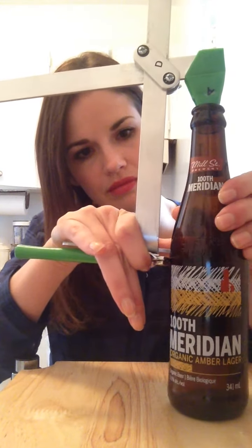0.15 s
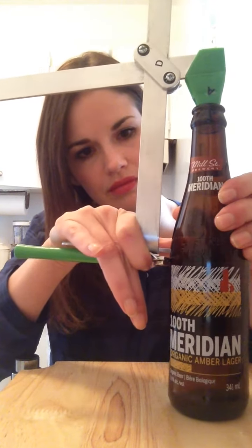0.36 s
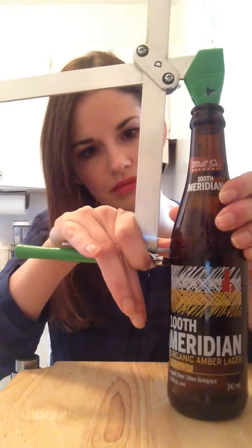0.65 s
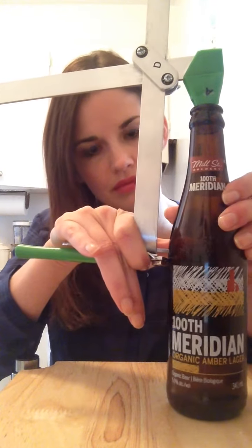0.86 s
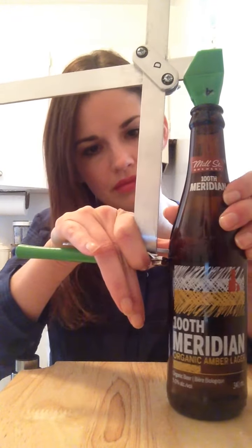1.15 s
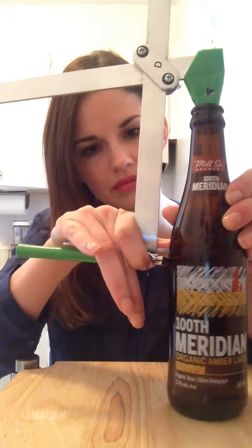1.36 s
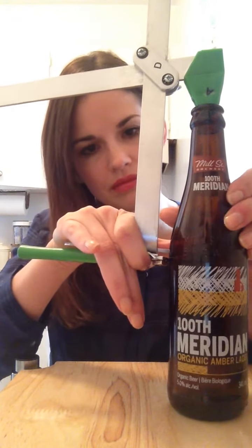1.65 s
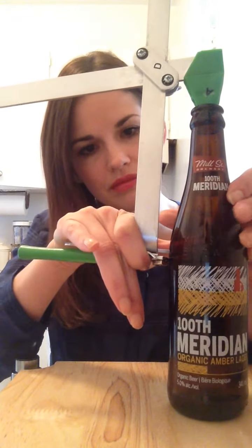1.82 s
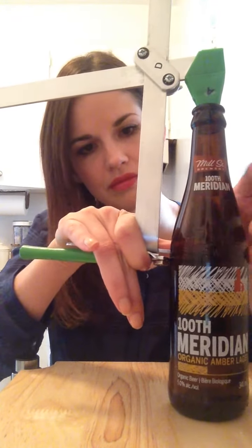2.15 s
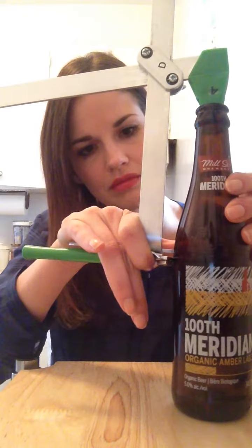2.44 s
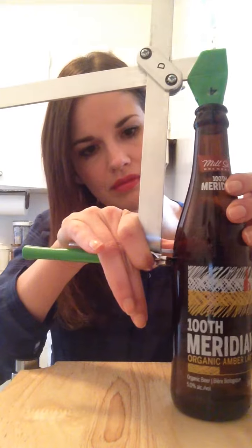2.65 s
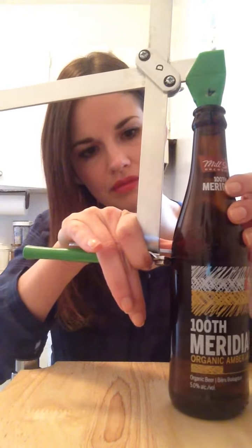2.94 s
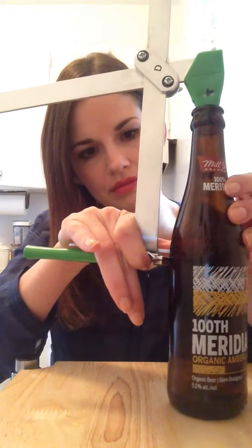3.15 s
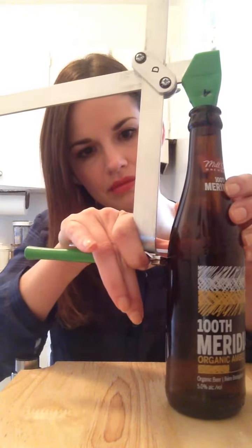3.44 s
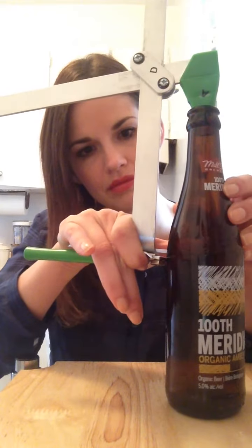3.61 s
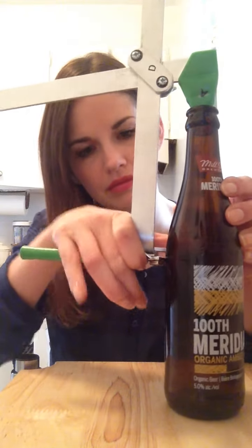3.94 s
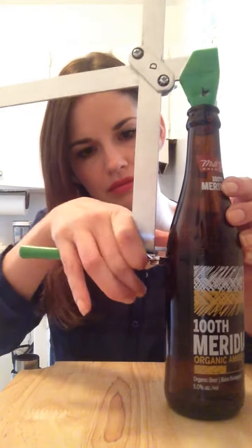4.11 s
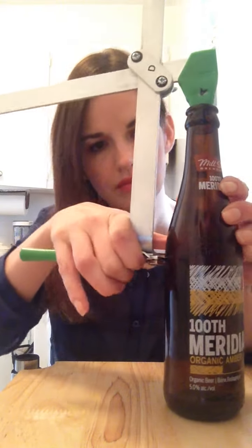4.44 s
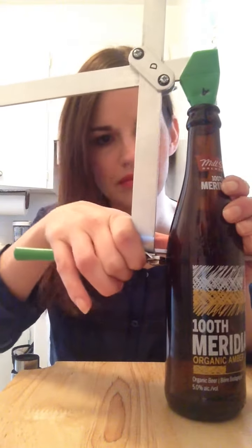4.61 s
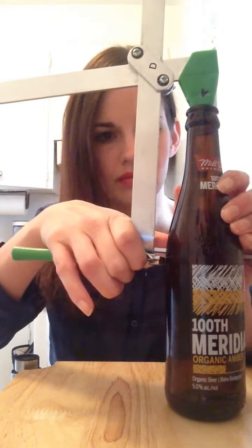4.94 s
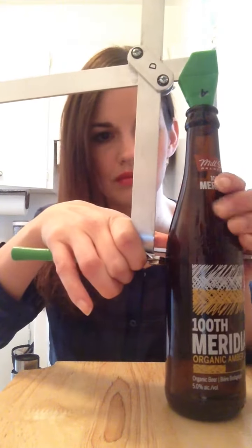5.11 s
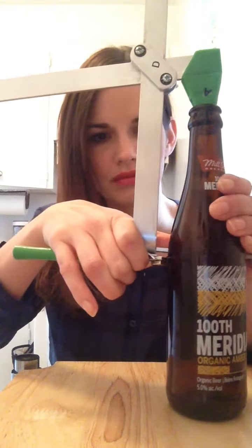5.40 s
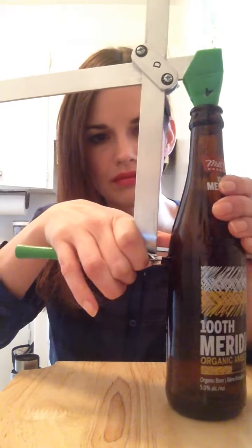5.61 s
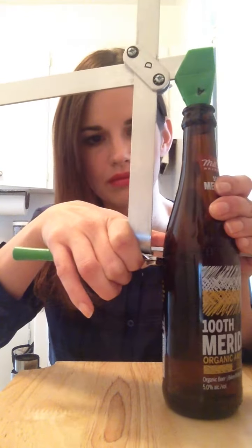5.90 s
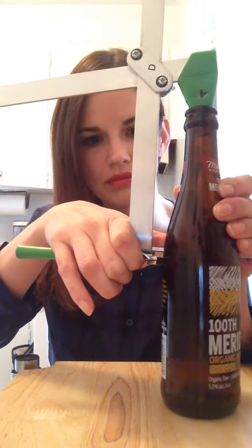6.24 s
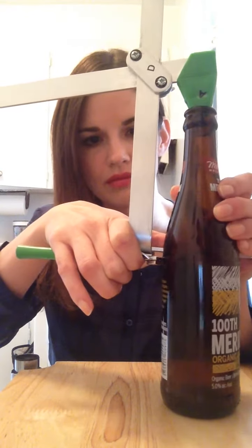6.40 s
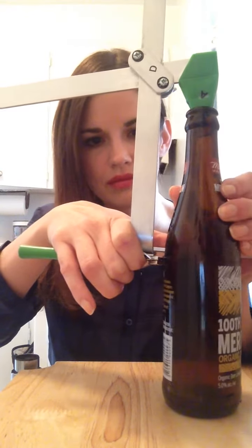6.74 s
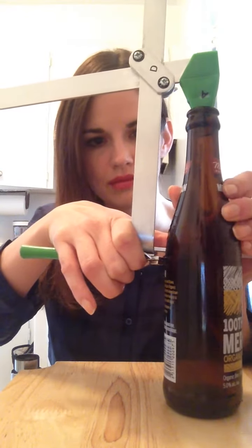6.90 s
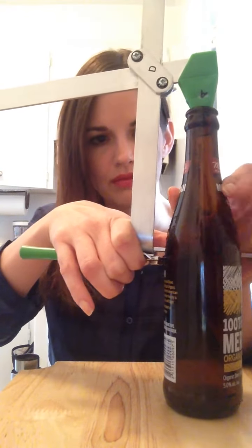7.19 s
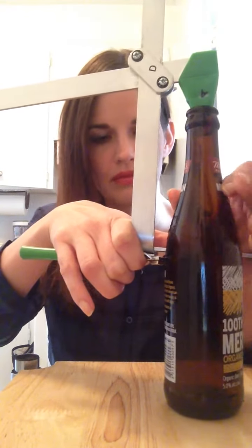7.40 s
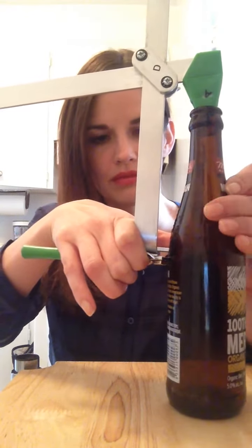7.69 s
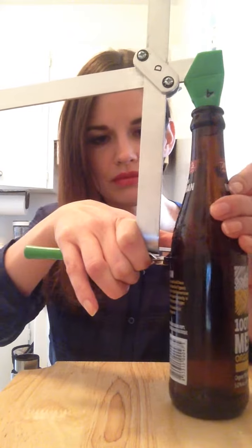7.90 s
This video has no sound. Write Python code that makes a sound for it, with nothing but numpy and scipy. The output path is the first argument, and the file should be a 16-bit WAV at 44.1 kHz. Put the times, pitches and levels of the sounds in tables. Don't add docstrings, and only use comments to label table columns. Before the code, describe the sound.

A glass bottle is scored in fits: crackling bright ticks, a pause, a hard ringing snap, then longer crackles over a low motor hum.

```python
import sys
import numpy as np
from scipy import signal
from scipy.fft import rfft, irfft
from scipy.io import wavfile

SR = 44100
rng = np.random.default_rng(int(sys.argv[2]) if len(sys.argv) > 2 else 0)


def convert_level_to_amplitude(level_db):
    exponent = np.asarray(level_db, float) / 20
    return 10 ** exponent


def store_wav(level_fs):
    pcm = np.round(np.clip(np.atleast_2d(level_fs), -1, 1) * 32767)
    wavfile.write(sys.argv[1], SR, pcm.T.astype(np.int16))


N = 355446


def rms_one(x):
    return x / np.sqrt(np.mean(x ** 2) + 1e-20)


def band(x, low_hz, high_hz):
    return signal.sosfilt(signal.butter(2, [low_hz, high_hz], "band", fs=SR, output="sos"), x)


def high_pass(x, order, corner_hz):
    return signal.sosfilt(signal.butter(order, corner_hz, "high", fs=SR, output="sos"), x)


def ring(force, hz, t60):
    radius, angle = convert_level_to_amplitude(-60 / (t60 * SR)), 2 * np.pi * hz / SR
    numerator = [0, np.sin(angle)]
    denominator = [1, -2 * radius * np.cos(angle), radius * radius]
    return signal.lfilter(numerator, denominator, force + 1e-18)


def clicks(seconds, sizes):
    return np.bincount((np.asarray(seconds) * SR).astype(int), sizes, N)[:N]


def drift(rate_hz):
    r = np.exp(-2 * np.pi * rate_hz / SR)
    return rms_one(signal.lfilter([1], [1, -2 * r, r * r], rng.standard_normal(N + SR))[SR:])


def crack(force, t60):
    r = convert_level_to_amplitude(-60 / (t60 * SR))
    envelope = signal.lfilter([np.sqrt(1 - r * r)], [1, -r], force + 1e-18)
    return envelope * rng.standard_normal(N)


# frequency in Hz, rms level in dB.
MOTOR_TONES = [(120, -78), (147.5, -62.5), (176, -52), (295, -67.5), (354.5, -69.5), (1065, -81.5)]
# frequency in Hz, width in Hz, level in dB.
ROOM_RESONANCES = [(89.1, 18, -69.5), (161.1, 18, -58.5), (190.1, 27.2, -57), (228, 11, -73.5),
                   (279, 25, -63.5), (295.5, 27, -63.5), (360, 24, -72), (449.4, 19, -66.5),
                   (467.5, 19, -68), (550, 50.8, -76), (895, 46, -72.5)]
# frequency in Hz, level in dB per Hz.
AIR_SPECTRUM = [(20, -55), (36, -46), (70, -1.5), (160, -1), (500, -4), (1000, -13), (2000, -21.5),
                (3800, -34), (8000, -40.5), (11000, -43.5), (15300, -40), (15700, -54.5), (17000, -62)]


def fan():
    t = np.arange(N) / SR
    out = np.zeros(N)
    for hz, db in MOTOR_TONES:
        level = np.sqrt(2) * convert_level_to_amplitude(db + 1.3 * drift(2.2))
        out += level * np.sin(2 * np.pi * (hz * t + rng.random()))
    for hz, width_hz, db in ROOM_RESONANCES:
        t60 = 1.4 / width_hz
        once = ring(rng.standard_normal(N + SR // 2), hz, t60)
        twice = ring(once, hz, t60)[SR // 2:]
        out += convert_level_to_amplitude(db) * rms_one(twice)
    hz = np.arange(N // 2 + 1) * SR / N + 1
    air_hz, air_db = np.transpose(AIR_SPECTRUM)
    colour = convert_level_to_amplitude(np.interp(np.log(hz), np.log(air_hz), air_db))
    rush = irfft(rfft(rng.standard_normal(N)) * colour, N)
    return out + convert_level_to_amplitude(-58 + .5 * drift(8.5)) * rms_one(rush)


def kitchen():
    t = np.arange(SR // 2) / SR
    white = rng.standard_normal(len(t)) * np.clip(t / 0.004, 0, 1)
    low_t60_s, top_t60_s = 0.23, 0.16
    tail = band(white * convert_level_to_amplitude(-60 * t / low_t60_s), 200, 6000)
    tail += band(white * convert_level_to_amplitude(-60 * t / top_t60_s), 6000, 18000)
    return tail / np.sqrt(np.sum(tail ** 2))


# start in seconds, peak in dB, pitch in Hz, t60 in seconds.
TABLE_KNOCKS = [(.85, -39.5, 575, 0.095), (1.432, -39, 715, 0.069), (1.446, -36.5, 595, 0.075),
                (1.75, -43.5, 580, 0.066), (1.824, -44, 1490, 0.041), (2.092, -58.5, 7140, 0.035),
                (2.092, -56, 9700, 0.023), (2.3, -44.5, 596, 0.077), (2.308, -52, 7200, 0.035),
                (2.308, -57, 3980, .04), (2.308, -61, 13600, .01), (5.176, -61, 5490, .01),
                (7.144, -39, 11510, .008), (7.144, -52, 4600, .01), (4.272, -39, 560, 0.091),
                (4.2995, -24.5, 538, 0.13), (4.32, -37, 527, .04), (4.2995, -26.5, 658.3, 0.053),
                (4.2995, -31, 830, .03), (4.2997, -28, 1150, .03), (4.2995, -18, 1950, .03),
                (6.025, -42, 995, 0.012), (6.025, -44.5, 1900, 0.01), (6.241, -45, 1390, .012),
                (6.241, -48, 2110, .012), (6.95, -42, 755, 0.081)]


def table():
    out = np.zeros(N)
    for s, peak_db, hz, t60 in TABLE_KNOCKS:
        blow = clicks([s], [convert_level_to_amplitude(peak_db)])
        tap = convert_level_to_amplitude(6.) * crack(blow, .4 * t60)
        out += band(tap, 0.84 * hz, min(1.6 * hz, .45 * SR))
        for ratio in (.94, 1.005, 1.08):
            out += ring(convert_level_to_amplitude(-11.0) * blow, hz * ratio, t60)
    return high_pass(out, 6, 460)


# start in seconds, end in seconds, grit level in dB, wall ring level in dB.
WHEEL_DRAGS = [(.72, .78, -82, -90), (1.19, 1.327, -77, -81), (1.317, 1.796, -81.5, -86),
               (1.99, 2.03, -77, -93), (3.94, 4.04, -75.5, -77.5), (4.99, 5.12, -75.5, -93),
               (5.38, 5.5, -84.5, -89), (5.6, 5.952, -69, -78), (5.948, 6.198, -77, -70),
               (6.23, 6.41, -62, -76), (6.5, 6.921, -78, -78.5), (7.05, 7.3, -86, -95),
               (7.7, 7.8, -82, -82), (7.88, 8.1, -77.5, -78)]


def grit():
    t, level = np.arange(N) / SR, np.zeros((2, N))
    edge_s = .02
    for start, end, *dbs in WHEEL_DRAGS:
        fade = np.clip(np.minimum(t - start, end - t) / edge_s + .5, 0, 1)
        level += convert_level_to_amplitude(np.array(dbs))[:, None] * fade
    chips_per_s = 1200. * convert_level_to_amplitude(5. * drift(25.))
    born = rng.random(N) < chips_per_s / SR
    sizes = convert_level_to_amplitude(4.8 * np.minimum(rng.exponential(1, N), 5)) * rng.choice([-1, 1], N)
    return level * rms_one(born * sizes)


# start in seconds, crack peak in dB.
SHORT_PULL_TICKS = [(0.7261, -49), (0.765, -42), (0.7829, -24.5), (0.7909, -28), (0.812, -27.5),
                    (0.8315, -32), (0.834, -29), (0.8487, -28), (0.86, -33), (0.8728, -35), (0.8984, -55),
                    (1.3034, -55), (1.373, -32.5), (1.4145, -45), (1.4311, -23), (1.448, -30),
                    (1.4707, -30), (1.5135, -52)]
# start in seconds, crack peak in dB.
LONG_PULL_TICKS = [(5.5998, -32.5), (5.6385, -33.5), (5.6628, -47.5), (5.6818, -49), (5.7159, -47),
                   (5.7327, -39), (5.7646, -31.5), (5.773, -31), (5.7975, -29.5), (5.8487, -34),
                   (5.8606, -33.5), (5.883, -33), (5.895, -29), (5.9001, -40), (5.9581, -37.5),
                   (5.9896, -44.5), (6.0091, -40), (6.032, -45), (6.0621, -31.5), (6.0794, -47),
                   (6.1073, -27), (6.1579, -44), (6.1967, -33.5), (6.2434, -37.5), (6.2619, -27.5),
                   (6.2746, -48), (6.319, -34.5), (6.3361, -38.5), (6.3921, -30), (6.4444, -51)]
# start in seconds, crack peak in dB.
LAST_PULL_TICKS = [(6.5795, -53), (6.6054, -55), (6.6216, -48.5), (6.6334, -35), (6.6674, -29),
                   (6.717, -42), (6.756, -47), (6.782, -35), (6.8136, -34.5), (6.8473, -48), (6.8716, -48),
                   (6.8852, -26.5), (6.9023, -31), (6.9319, -33.5), (6.9691, -33.5), (7.0118, -50)]
# start in seconds, crack peak in dB, wall ring in dB.
STRAY_TICKS = [(0.441, -61, -72), (0.6725, -53, -83), (1.2163, -55, -75), (1.268, -58, -80),
               (1.6708, -66, -72), (1.722, -64, -67), (1.7431, -59, -55.5), (1.8246, -70, -68),
               (4.0132, -62, -69), (4.117, -57, -73), (4.552, -62, -67), (4.5587, -50, -75),
               (5.1762, -54, -71), (5.4114, -64, -71), (5.4408, -53, -74), (6.4747, -51, -78),
               (7.1433, -48.5, -69.5), (7.1806, -63, -74), (7.234, -64, -70), (7.4574, -65, -83.5),
               (7.4864, -66, -77), (7.814, -60.5, -67.5), (7.9393, -53.5, -83), (7.981, -50, -62.5),
               (7.9977, -49, -66), (8.0473, -53, -77)]
# start in seconds, crack peak in dB, wall
# ring in dB, shoulder ring in dB.
LEAD_IN_TICKS = [
    (4.254, -71.5, -69.5, -76),
    (4.273, -50.5, -62, -63.5),
    (4.276, -39.5, -60.5, -58.5),
    (4.284, -53, -47, -60),
    (4.29, -52.5, -42.5, -60.5),
    (4.294, -47, -39, -52),
]


def fractures():
    pulls = [(SHORT_PULL_TICKS, -16, -17),   # ticks, wall and shoulder ring below the crack in dB
             (LONG_PULL_TICKS, -14.5, -20.5),
             (LAST_PULL_TICKS, -16, -20.5)]
    rows = []
    for ticks, wall_db, shoulder_db in pulls:
        for s, db in ticks:
            wall_scatter, shoulder_scatter = 0.5 * rng.normal(size=2)
            rows.append((s, db, db + wall_db + wall_scatter, db + shoulder_db + shoulder_scatter))
    for s, db, wall_db in STRAY_TICKS:
        rows.append((s, db, wall_db, db - 19))
    return rows + list(LEAD_IN_TICKS)


WALL_MODE_HZ = (3112, 3480, 3700, 3784, 3870, 3951, 4165, 4370, 4740)
SHOULDER_MODE_HZ = (6848, 7050, 7470, 7844, 7973, 8330)
GLASS_MODE_HZ = (2440, 2860, 5560, 8880, 9690, 9884, 10230, 10425, 11000, 11600, 12500, 13300, 14120, 14600,
                  15050)
# dB when ticked, dB when snapped, t60 in seconds.
WALL_MODES = [(-31.5, -16.5, 0.037), (-30, -13.5, 0.027), (-33, -9.5, 0.016), (-22.5, -3.5, 0.042),
              (-11.5, -3, 0.033), (0, 2.5, 0.06), (-20, -7, 0.039), (-20.5, -9, 0.0299), (-19, -12.5, .045)]
SHOULDER_MODES = [(-8.5, -16, 0.045), (-10.5, -18, 0.028), (-13.5, -18.5, .02), (-7, -7, 0.052),
                  (-5.5, -7.5, 0.085), (-4, -16.5, 0.014)]
GLASS_MODES = [(-21, -14.5, 0.033), (-23.5, -17.5, 0.03), (-14.5, -25.5, 0.02143), (-15, -15, 0.0394),
               (-7, -15.5, .025), (-12, -1, .04), (-0.5, -14.5, 0.021), (-10, -5.5, .03),
               (-14.5, -23, 0.011), (-14.5, -27.5, 0.009), (-12, -21.5, 0.015), (-16, -17.5, .012),
               (-9, -19, .025), (-10.5, -20.5, 0.011), (-4, -13, .02)]
# frequency in Hz, width in Hz.
RADIATION_DIPS = [(5200, 390), (6400, 300)]


def bottle():
    snap_s, snap_db = 4.2995, -14.5
    pressed = .78
    s, crack_db, wall_db, shoulder_db = np.transpose(fractures())
    chips, wall_chips = grit()

    def snap_noise(delay_s, db, t60, low_hz, high_hz):
        return band(crack(clicks([snap_s + delay_s], [convert_level_to_amplitude(snap_db + db)]), t60), low_hz, high_hz)

    out = band(crack(clicks(s, convert_level_to_amplitude(crack_db + 5.5)), 0.067) + convert_level_to_amplitude(-8.0) * chips, 4500, 17000)
    blow = clicks(s + .0002, convert_level_to_amplitude(wall_db + 3.5))
    wall_force = blow + .45 * crack(blow, 0.035) + convert_level_to_amplitude(-22.0) * wall_chips
    shoulder_force = crack(clicks(s, convert_level_to_amplitude(shoulder_db + 5)), 0.009) + convert_level_to_amplitude(-26.5) * chips
    glass_force = crack(clicks(s, convert_level_to_amplitude(crack_db - 10)), 0.0068) + convert_level_to_amplitude(-26.0) * chips
    families = [(WALL_MODE_HZ, WALL_MODES, wall_force),
                (SHOULDER_MODE_HZ, SHOULDER_MODES, shoulder_force),
                (GLASS_MODE_HZ, GLASS_MODES, glass_force)]
    for family_hz, modes, force in families:
        for k, (hz, (tick_db, mode_snap_db, t60)) in enumerate(zip(family_hz, modes)):
            start_s = snap_s + .0008 * rng.random()
            snap = clicks([start_s], [convert_level_to_amplitude(snap_db + mode_snap_db)])
            ticked = ring(convert_level_to_amplitude(tick_db + 0.5) * force, hz, pressed * t60)
            out += (-1) ** k * (ticked + ring(snap, hz, t60))
    out = high_pass(out, 2, 2300)
    out += snap_noise(0.0043, 8.5, .07, 3800, 4900)
    out += snap_noise(0, 5.0, .12, 6500, 11500)
    for hz, width_hz in RADIATION_DIPS:
        out = out - .7 * signal.lfilter(*signal.iirpeak(hz, hz / width_hz, SR), out)
    return out + snap_noise(0, 15.5, .014, 1200, 6500)


def scene():
    hum, echoes = fan(), kitchen()
    near = table() + bottle()
    echo = convert_level_to_amplitude(-10.5) * signal.fftconvolve(near, echoes)[:N]
    return (near + echo + hum)[None]


def roll_off(x):
    return signal.sosfilt(signal.butter(12, 16830, fs=SR, output="sos"), x)


def record(dry):
    climb_db = 1.4 * np.arange(N) / SR
    over_db = 0.16 * np.maximum(20 * np.log10(np.abs(dry[0]) + 1e-9) + 22, 0)
    held_db = np.maximum(np.maximum.accumulate(over_db + climb_db) - climb_db, 0)
    slow = np.exp(-1 / (0.0184 * SR))
    x = dry * convert_level_to_amplitude(-signal.lfilter([1 - slow], [1, -slow], held_db))
    low = signal.sosfiltfilt(signal.butter(30, 15300, fs=SR, output="sos"), x)
    top = signal.sosfiltfilt(signal.butter(12, 16300, fs=SR, output="sos"), x - low)
    mix = low + convert_level_to_amplitude(-16.) * top
    return roll_off(mix)


dry = scene()
out = record(dry)
store_wav(out)
```